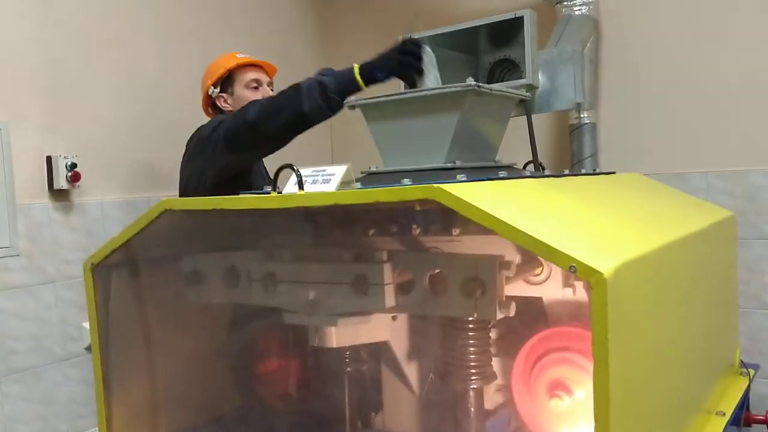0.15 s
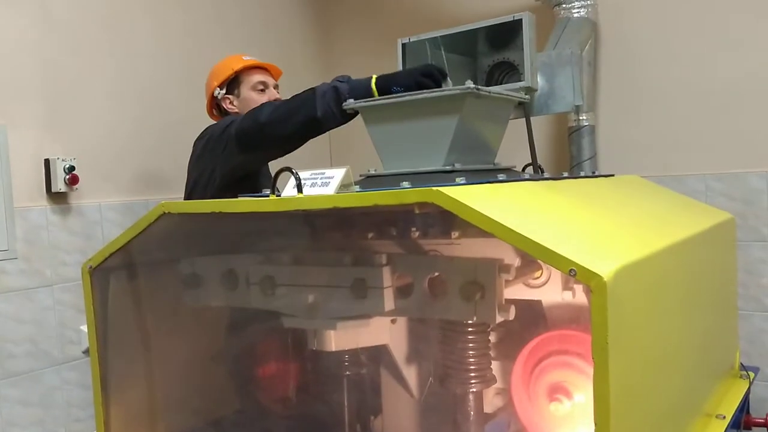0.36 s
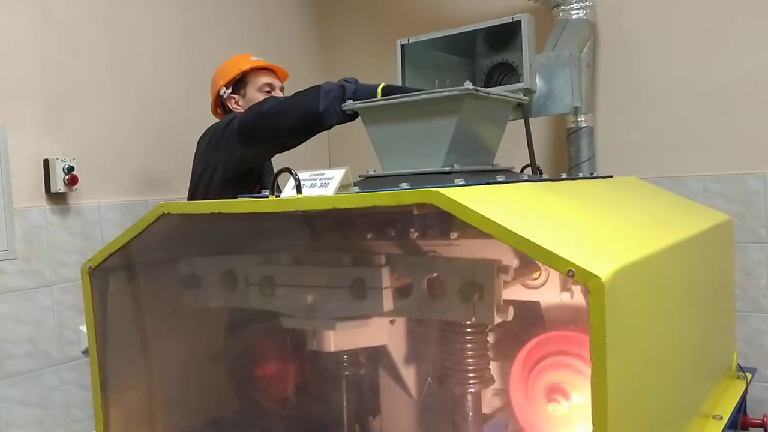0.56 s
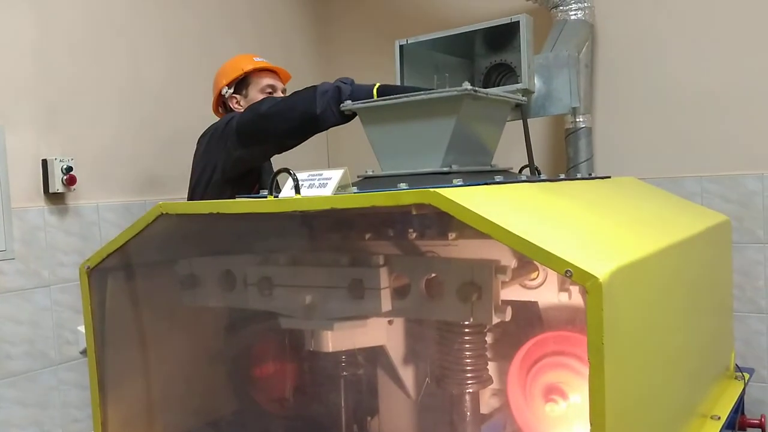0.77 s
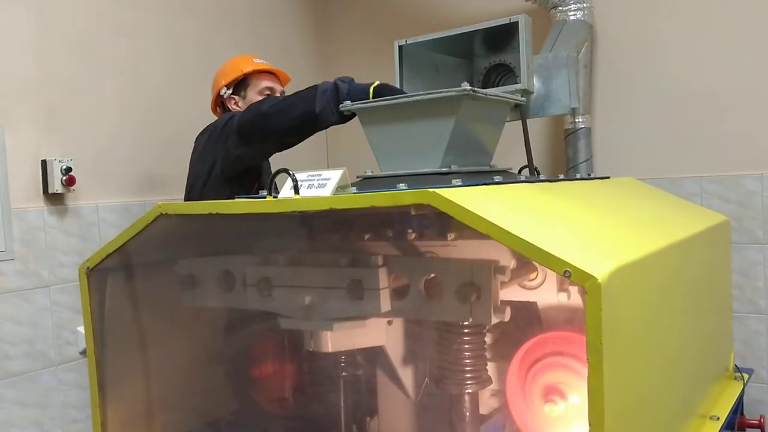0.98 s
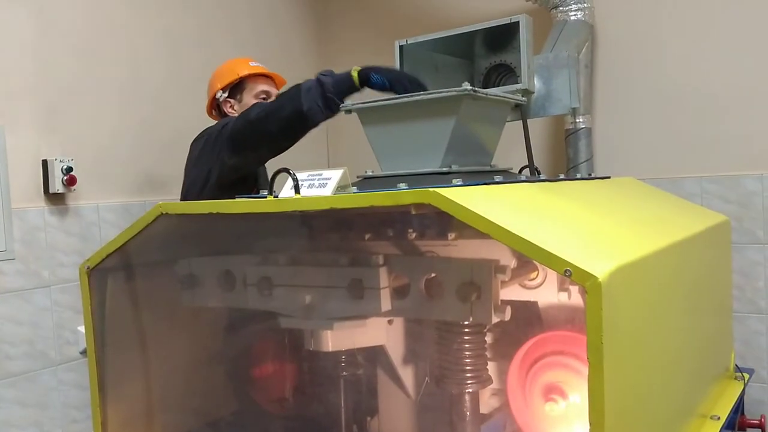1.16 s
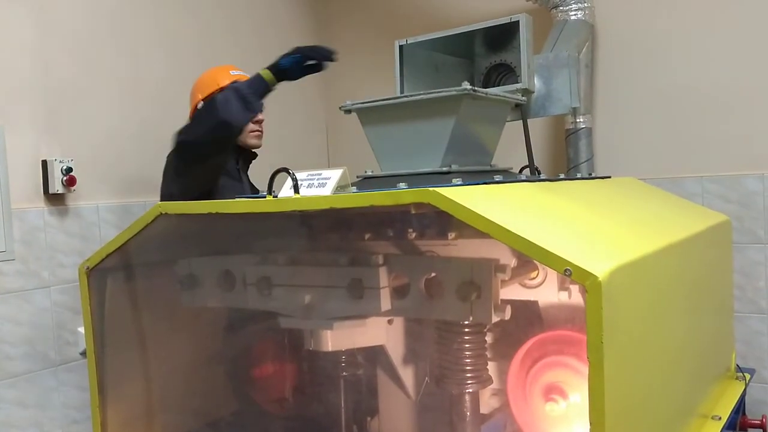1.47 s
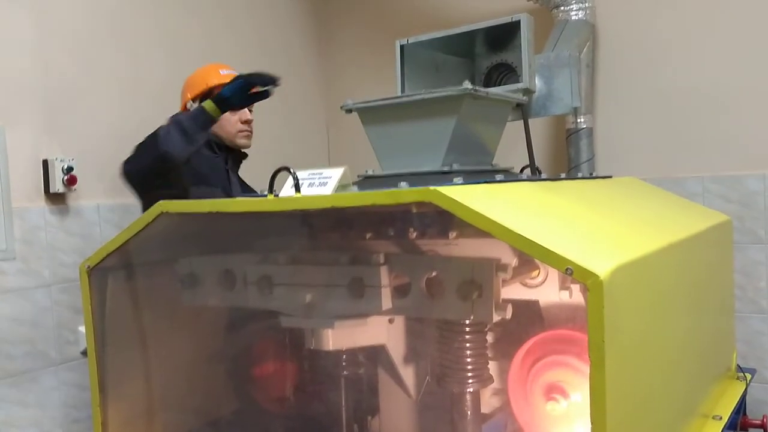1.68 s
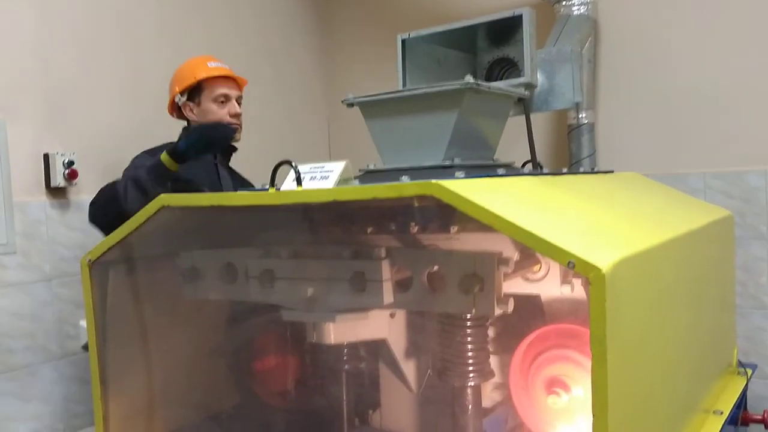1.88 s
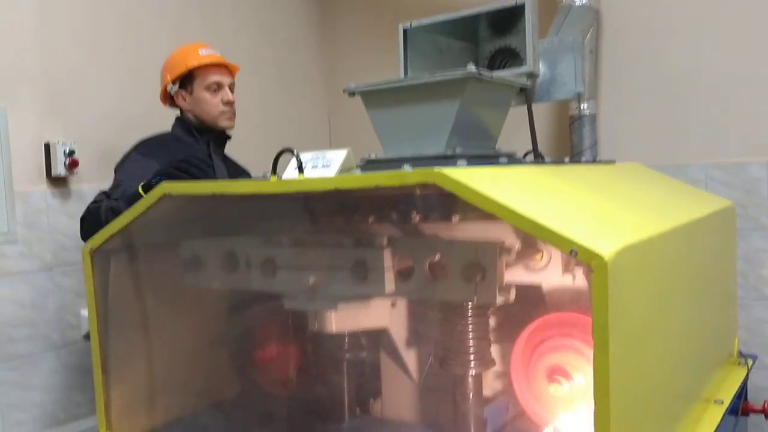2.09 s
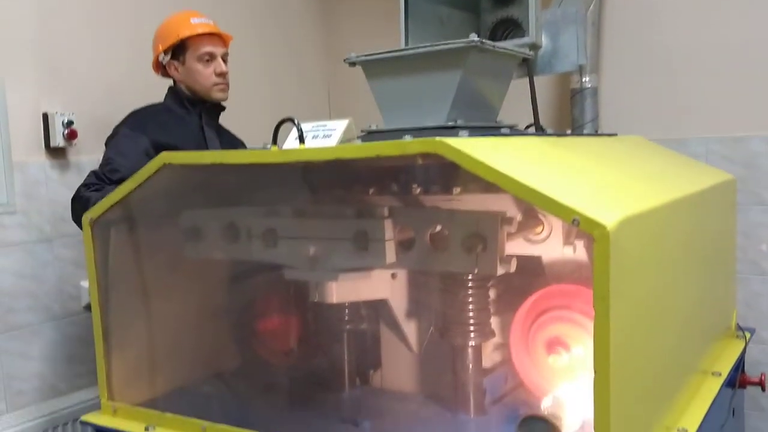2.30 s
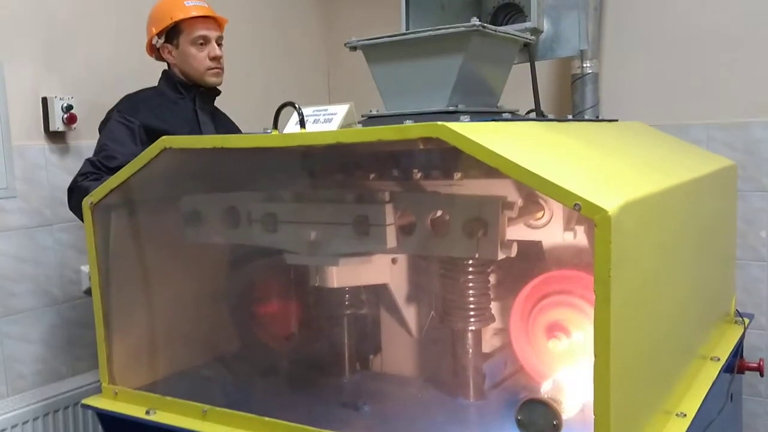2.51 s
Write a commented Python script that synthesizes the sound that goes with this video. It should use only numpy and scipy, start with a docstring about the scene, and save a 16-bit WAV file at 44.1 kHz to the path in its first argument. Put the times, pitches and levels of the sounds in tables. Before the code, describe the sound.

A jaw crusher runs with a loud rattling roar and steady chord of low and middle hums, in a small hard room. Hard steel knocks ring from 0.2 s. Around 1.2 s a load thumps and clatters into the hopper, tumbling; the level ducks, then slowly recovers. Crunching grows, strongest from 1.8 s, with snaps near 1.8 and 2.0 s and a dull slump at 2.4 s.

```python
"""A steady chord of hums over a rattling roar: a shaft shakes a crusher's steel frame, and the mains hums along.
Hard knocks of the jaws ring the steel walls, then a load thumps in as noise bursts and tumbles on.
The jaws crunch it with cracks and low grinding noise, while the load unsettles the hums and damps many.
Lumps snap and the load slumps, as short noise bursts in a small hard room.
The microphone's gain control ducks on loud sound and slowly recovers."""
import sys
import numpy as np
from scipy import signal
from scipy.fft import rfft, irfft, next_fast_len
from scipy.io import wavfile
from scipy.ndimage import map_coordinates

SR = 44100
rng = np.random.default_rng(int(sys.argv[2]) if len(sys.argv) > 2 else 0)


def digitize_waveform(pressure):
    """Quantize a signal to 16-bit integers and store it at the path in sys.argv[1].

    Rows of a 2-D input are taken as channels; values are limited to [-1, 1].
    """
    field = np.atleast_2d(pressure).T
    bounded = np.clip(field, -1, 1)
    quanta = np.round(bounded * 32767).astype(np.int16)
    wavfile.write(sys.argv[1], SR, quanta)


N = 116865  # length in samples
SHAFT_HZ = 24.9
SIDES = np.array([[1], [-1]]) / 2  # shares a left-right difference between left and right


def amp(db):
    """Turn decibels into a plain multiplier."""
    return 10 ** (np.asarray(db) / 20)


def unit(x):
    """Scale a sound to an rms (average strength) of 1."""
    return x / np.sqrt(np.mean(x ** 2) + 1e-20)


def clock():
    """The time of every sample, in seconds."""
    return np.arange(N) / SR


def along(points, hz):
    """Read a curve of (pitch_hz, value) points, joined by lines on a log pitch axis."""
    pitch_hz, value = np.transpose(points)
    return np.interp(np.log(hz + 1), np.log(pitch_hz + 1), value)


def wobble(rate):
    """A smooth random curve through `rate` random points a second."""
    points = rng.standard_normal(int(N * rate / SR) + 4)
    return map_coordinates(points, [clock() * rate])


def spectral(x, change):
    """Reshape a sound by pitch: apply change(spectrum, hz), with padding against wrap-around."""
    size = next_fast_len(N + SR // 2)
    hz = np.fft.rfftfreq(size, 1 / SR)
    return irfft(change(rfft(x, size), hz), size)[..., :N]


def coloured(x, spectrum):
    """Give a sound the tone curve of a table, at an rms of 1."""
    return unit(spectral(x, lambda z, hz: z * amp(along(spectrum, hz))))


def noise():
    """Two unrelated channels of white noise."""
    return rng.standard_normal((2, N))


def per_turn(turns, swing_db):
    """A gain that swells once per turn of the shaft; swing_db is the rms swing."""
    return amp(swing_db * np.sqrt(2) * np.cos(2 * np.pi * (turns - 1 / 4)))


def burst(peak_s, spectrum, db, rise, decay):
    """A swell of noise that peaks at peak_s and dies away; rise and decay are in dB per second."""
    t = clock() - peak_s
    envelope = amp(db + np.minimum(rise * t, -decay * t))
    return envelope * coloured(noise(), spectrum)


PORT_COMB_HZ = 2350  # the phase between the ports goes once round in this many Hz
# How alike left and right are: pitch_hz, likeness (0 to 1)
LIKENESS = [(70, .9), (150, .5), (230, .5), (330, .72), (450, .7), (650, .92), (1100, .96), (1700, .93),
            (2350, 1), (3500, .99), (4700, 1), (5900, .86), (7000, .7), (8300, .45), (14000, .45)]
# How much of the treble arrives from the right: pitch_hz, share (0 to 1)
FROM_THE_RIGHT = [(3500, 0.077), (6000, 0.051), (10000, .9)]


def likeness(hz):
    """How the right port follows the left; their spacing swings the treble in and out of phase."""
    lag = 2 * np.pi * hz / PORT_COMB_HZ
    from_right = np.clip(along(FROM_THE_RIGHT, hz), 0, 1)
    treble_swing = -np.cos(lag) + 1j * from_right * np.sin(lag)
    swing = np.where(lag < np.pi, 1, treble_swing)
    return np.clip(along(LIKENESS, hz), 0, 1) * swing


# Loudness of left over right: pitch_hz, difference_db
LEFT_OVER_RIGHT = [(60, -2), (440, 1), (900, 0), (2350, 0), (3200, -1.5), (4700, 0), (5600, -1),
                   (8600, -3.7), (14000, -5)]


def ports(pair):
    """Blend two unrelated signals into the partly alike sound of the room at the left and right ports."""
    def mix(z, hz):
        shared = likeness(hz)
        own = np.sqrt(np.clip(1 - abs(shared) ** 2, 0, 1))
        right = shared * z[0] + own * z[1]
        return np.array([z[0], right]) * amp(along(LEFT_OVER_RIGHT, hz) * SIDES)
    return spectral(pair, mix)


HUM_DB = -2.5  # added to every hum
LOAD_S, LOAD_RAMP_S = 1.04, 0.1  # when the load starts to act on the hums, and how long that takes
HUM_DRIFT_RAD, LOADED_DRIFT_RAD = .08, 0.46  # phase drift, and how much the load adds
HUM_WAVER_DB, LOADED_WAVER_DB = 1.26, 1.75  # level waver, and how much the load adds
RING_ORDER, RING_LAG_TURNS = 28, .25  # multiple at the frame's main ring; its delay in each turn
RING_SCATTER_RAD = .4  # phase scatter per step away from the main ring
# Pitches of the frame's hums and the mains hum, as multiples of the shaft rate
HUM_MULTIPLES = [2, 3, 4, 12, 13, 14, 15, 16, 19, 22, 27, 28, 29, 32, 35, 37, 44, 49, 52, 55, 70, 73, 140]
# One hum per multiple: level_db (before HUM_DB), left_over_right_db, change_under_load_db
HUM_LEVELS = [(-51, 7, 0), (-31, 1, 0), (-50, 12, 1.5), (-27, -0.5, 0.5), (-35, 8.5, 5.5), (-31, -1, -3),
              (-69, 5, -13), (-33.5, 17.5, -1), (-47.5, 11, 1.5), (-37.5, -9, 5), (-34, 4, 2), (-23, 1, -4),
              (-28.5, -1, -7), (-29, 2, -5), (-43.5, -15, -0.5), (-37.5, -3, -11), (-42, -2, -12),
              (-36, 0, -2), (-43, -1, -10), (-43, -15, -23), (-37.5, -17.5, -4), (-44.5, 10, -24),
              (-47, 3, 0.5)]


def hums(turns):
    """The shaken frame sings and the mains hums; hums near the frame's main ring throb with each turn."""
    loaded = np.clip((clock() - LOAD_S) / LOAD_RAMP_S, 0, 1)
    out = np.zeros((2, N))
    for multiple, (db, pan_db, load_db) in zip(HUM_MULTIPLES, HUM_LEVELS):
        looseness = min(multiple / 20, 1)  # low hums drift and waver less
        drift = looseness * (HUM_DRIFT_RAD + LOADED_DRIFT_RAD * loaded) * wobble(18)
        scatter = RING_SCATTER_RAD * (multiple - RING_ORDER) * rng.standard_normal()
        phase = 2 * np.pi * multiple * (turns - RING_LAG_TURNS) + scatter + drift
        # Phase difference between the two ports
        lead = np.arccos(likeness(multiple * SHAFT_HZ).real)
        waver_db = looseness * (HUM_WAVER_DB + LOADED_WAVER_DB * loaded) * wobble(20)
        level_db = HUM_DB + db + load_db * loaded + waver_db
        out += np.sqrt(2) * amp(level_db + pan_db * SIDES) * np.sin(phase - lead * SIDES)
    return out


ROAR_DB, PULSE_DB = -20, 0.25  # level; rms swing per turn
REPEAT_DB = -6  # gain of the part that repeats, before it is filtered
REPEAT_LOW_HZ, REPEAT_HIGH_HZ = 400, 2200  # the repeating part lies mostly between these
SWAY_DB, HISS_SWAY_DB = 0.34, 1  # random sway of the low part and of the hiss
# Tone of the empty machine's roar: pitch_hz, relative_level_db (per Hz)
ROAR_TONE = [(25, -31), (55, -30.5), (110, -17.5), (160, -7), (230, -6), (330, -1), (450, 2.5), (580, -1),
             (700, 0), (900, -9.5), (1250, -8.5), (1600, -12.5), (1850, -11), (2500, -15.5), (3000, -18.5),
             (3500, -20.5), (3900, -22.5), (4600, -21.5), (6500, -23.5), (9000, -26), (11500, -23),
             (14000, -30)]


def roar(turns):
    """Steel parts rattle on every turn, partly alike from turn to turn; the hiss above sways on its own."""
    def keep_middle(z, hz):
        less_high = z / (1 + (hz / REPEAT_HIGH_HZ) ** 4)
        return less_high / (1 + (REPEAT_LOW_HZ / (hz + 1)) ** 8)

    turn_size = round(SR / SHAFT_HZ)
    one_turn = rng.standard_normal((2, turn_size))
    repeating = spectral(one_turn[:, np.arange(N) % turn_size], keep_middle)
    rattle = noise() + amp(REPEAT_DB) * repeating
    low = spectral(rattle, lambda z, hz: z / (1 + (hz / 1500) ** 2))
    hiss = rattle - low
    swaying_low = low * per_turn(turns, PULSE_DB) * amp(SWAY_DB * wobble(9.53))
    swaying_hiss = hiss * amp(HISS_SWAY_DB * wobble(48.65))
    return amp(ROAR_DB) * coloured(swaying_low + swaying_hiss, ROAR_TONE)


STRIKE_S = 0.0019  # how softly each knock begins
# Hard knocks of the jaws: start_s, level_db
JAW_KNOCKS = [(.2, -7), (.608, -7), (.682, -7), (.728, -7), (.85, -9), (.892, -8), (.971, -6), (1.124, -6),
              (1.137, -9), (1.158, -6), (1.183, 1), (1.196, 2), (1.224, 0), (1.263, -1), (1.287, 0),
              (1.406, -1)]
# Ringing of the steel walls: pitch_hz, level_db (added to the knock's), time_to_fall_60_db_s
WALL_RINGS = [(402, -15, 0.05), (482, -10, 0.075), (724, -9.5, 0.046), (1017, -19, 0.032),
              (1460, -18.5, 0.027), (3620, -31, .012)]


def jaw_knocks():
    """Hard knocks of the jaws ring the steel walls, which are too small to radiate bass."""
    out = np.zeros(N)
    for start_s, knock_db in JAW_KNOCKS:
        t = np.maximum(clock() - start_s, 0)
        for hz, ring_db, t60 in WALL_RINGS:
            tone = np.sin(2 * np.pi * (hz * t + rng.random()))
            ring = tone * (1 - np.exp(-t / STRIKE_S))
            scatter_db = rng.normal(0, 1.3)
            out += amp(knock_db + ring_db + scatter_db - 60 * t / t60) * ring
    no_bass = signal.butter(4, 220, "high", fs=SR, output="sos")
    return signal.sosfilt(no_bass, out)


FALL_START_S, FALL_ONSET_S = 1.112, 0.018  # silent before the start, then fades in
FALL_S = 1.178  # peak of all four bursts


def pour(spectrum, db, rise, decay):
    """Many pieces land almost together, blurring into one burst of noise."""
    landed = np.clip((clock() - FALL_START_S) / FALL_ONSET_S, 0, 1)
    return landed * burst(FALL_S, spectrum, db, rise, decay)


BOOM_DB, BOOM_RISE_DB_PER_S, BOOM_DECAY_DB_PER_S = -10.5, 167, 59
CLATTER_DB, CLATTER_RISE_DB_PER_S, CLATTER_DECAY_DB_PER_S = -15, 63, 82
SPRAY_DB, SPRAY_RISE_DB_PER_S, SPRAY_DECAY_DB_PER_S = -19, 403, 128
TUMBLE_DB, TUMBLE_RISE_DB_PER_S, TUMBLE_DECAY_DB_PER_S = -15, 198, 24
# Tones of the hopper's boom, the clatter of pieces, the spray of grit and the tumbling down the throat.
# Each one: pitch_hz, relative_level_db (per Hz)
BOOM_TONE = [(70, -50), (130, -28), (190, -4), (270, -3), (350, -7), (480, 4), (620, 0.5), (730, 9),
             (850, -34), (1300, -23), (3000, -57)]
CLATTER_TONE = [(400, -40), (700, -0.5), (950, 11), (1200, -1), (1800, -23), (3000, -45)]
SPRAY_TONE = [(700, -22), (1500, 10), (2500, 12), (3500, 3), (5000, -5), (8000, -18), (14000, -33)]
TUMBLE_TONE = [(120, -37), (260, -22), (330, 2), (440, 12), (560, -3), (800, -19), (1050, -9.5),
               (2000, -42)]


def fall():
    """The load drops into the hopper and tumbles on towards the jaws: four bursts with their own decays."""
    boom = pour(BOOM_TONE, BOOM_DB, BOOM_RISE_DB_PER_S, BOOM_DECAY_DB_PER_S)
    clatter = pour(CLATTER_TONE, CLATTER_DB, CLATTER_RISE_DB_PER_S, CLATTER_DECAY_DB_PER_S)
    spray = pour(SPRAY_TONE, SPRAY_DB, SPRAY_RISE_DB_PER_S, SPRAY_DECAY_DB_PER_S)
    tumble = pour(TUMBLE_TONE, TUMBLE_DB, TUMBLE_RISE_DB_PER_S, TUMBLE_DECAY_DB_PER_S)
    return boom + clatter + spray + tumble


CRACKS_PER_S, CRACK_DB = 300, -6  # average rate per channel; cracks relative to the noise under them
BITE_DB, GRIT_SWAY_DB = -1, 1  # rms swing per turn (minus: dips where the roar swells); random sway
# How the crushing grows and varies: time_s, grinding_level_db, grit_level_db
CRUSHING_LEVELS = [(1.2, -47, -56), (1.4, -30.5, -46), (1.72, -28.5, -38), (1.8, -23, -28),
                   (1.93, -23.5, -26), (2.08, -25.5, -36), (2.3, -27.5, -31), (2.41, -28, -30.5),
                   (2.5, -37, -32), (2.62, -26.5, -29)]
# Tone of the jaws' low grinding: pitch_hz, relative_level_db (per Hz)
GRIND_TONE = [(60, -24), (130, -11.5), (210, 7.5), (330, -15), (430, -5), (550, 1.5), (800, -7.5),
              (1300, -7.5), (2500, -26.5)]
# Tone of their cracking grit: pitch_hz, relative_level_db (per Hz)
GRIT_TONE = [(400, -20), (1200, -8), (2000, 3.5), (3200, -2), (5000, -5), (8500, -24), (11500, -10),
             (14000, -24)]


def crunch(turns):
    """The jaws bite once a turn: small random cracks in a gritty noise, over a low grinding."""
    time_s, grind_db, grit_db = np.transpose(CRUSHING_LEVELS)
    grind_level_db = np.interp(clock(), time_s, grind_db)
    grit_level_db = np.interp(clock(), time_s, grit_db) + GRIT_SWAY_DB * wobble(22.4)
    bite = per_turn(turns, BITE_DB)
    cracks = (rng.random((2, N)) < CRACKS_PER_S / SR) * noise()
    gritty = noise() + amp(CRACK_DB) * unit(cracks)
    grit = coloured(gritty * bite, GRIT_TONE)
    grind = coloured(noise() * bite, GRIND_TONE)
    return amp(grind_level_db) * grind + amp(grit_level_db) * grit


SNAP_RISE_DB_PER_S, SNAP_DECAY_DB_PER_S = 1200, 197
SLUMP_S, SLUMP_DB, SLUMP_RISE_DB_PER_S, SLUMP_DECAY_DB_PER_S = 2.415, -23, 72, 134
# Lumps snapping in the jaws: peak_s, level_db
LUMP_SNAPS = [(1.775, -30), (1.972, -25)]
# Tone of a snap: pitch_hz, relative_level_db (per Hz)
SNAP_TONE = [(1200, -29), (2800, 2), (4200, 2), (6000, -3), (8000, -22), (14000, -30)]
# Tone of the slump, a dull thud with a hiss of dust: pitch_hz, relative_level_db (per Hz)
SLUMP_TONE = [(100, -28), (170, -4.5), (225, 9), (340, -5.5), (600, -24), (5000, -25), (8000, -23),
              (11500, -23), (14000, -26)]


def breaking():
    """Lumps snap between the jaws as sharp bursts, then the load slumps with a softer one."""
    snaps = np.zeros((2, N))
    for peak_s, db in LUMP_SNAPS:
        snaps += burst(peak_s, SNAP_TONE, db, SNAP_RISE_DB_PER_S, SNAP_DECAY_DB_PER_S)
    slump = burst(SLUMP_S, SLUMP_TONE, SLUMP_DB, SLUMP_RISE_DB_PER_S, SLUMP_DECAY_DB_PER_S)
    return snaps + slump


SPEED_WAVER = 0.00068  # random waver of the shaft speed, as a fraction


def scene():
    """Turn the shaft, and add up the hums, the machine's noises and the falling load."""
    shaft_hz = SHAFT_HZ * (1 + SPEED_WAVER * wobble(3.92))
    turns = np.cumsum(shaft_hz) / SR
    noises = roar(turns) + fall() + crunch(turns) + breaking()
    return ports(noises) + hums(turns) + jaw_knocks()


def trailing(x, seconds):
    """The mean over the last moments."""
    size = max(int(seconds * SR), 1)
    return signal.fftconvolve(x, np.ones(size) / size)[:N]


THRESHOLD_DB, DUCK_SHARE = -14, 1.158  # ducking starts here; dB of ducking per dB above it
RECOVER_DB_PER_S, SENSE_S, DUCK_S = 9, 0.033, 0.053  # recovery; averaging of the level and of the ducking
CEILING, TOP_HZ = .85, 14330  # peaks round off towards the ceiling; nothing passes above TOP_HZ


def record(dry):
    """Gain control ducks quickly and creeps back, peaks are rounded off, and the top treble is cut."""
    power = abs(trailing(np.mean(dry ** 2, axis=0), SENSE_S))
    level_db = 10 * np.log10(power + 1e-12)
    wanted_duck_db = DUCK_SHARE * np.maximum(level_db - THRESHOLD_DB, 0)
    # A running maximum on a rising slope: jumps up at once, falls back at the recovery rate
    creep_db = RECOVER_DB_PER_S * clock()
    duck_db = np.maximum.accumulate(wanted_duck_db + creep_db) - creep_db
    held = dry * amp(-trailing(duck_db, DUCK_S))
    rounded = held / (1 + (held / CEILING) ** 8) ** (1 / 8)
    return spectral(rounded, lambda z, hz: z * (hz < TOP_HZ))


dry = scene()
out = record(dry)
digitize_waveform(out)
```